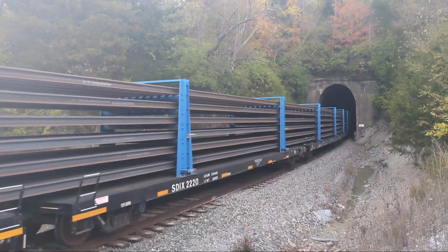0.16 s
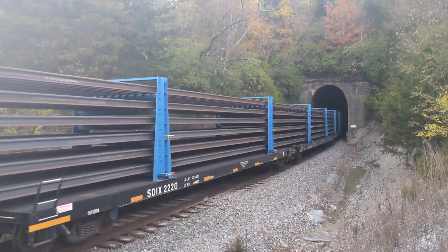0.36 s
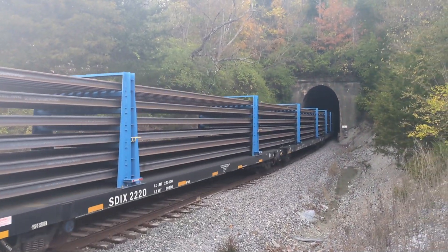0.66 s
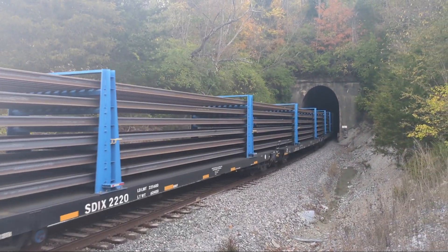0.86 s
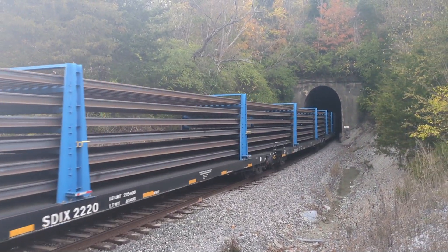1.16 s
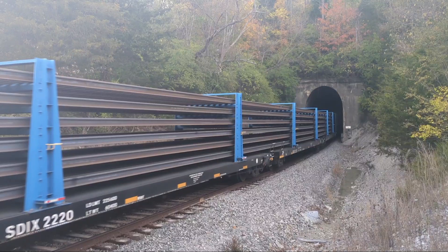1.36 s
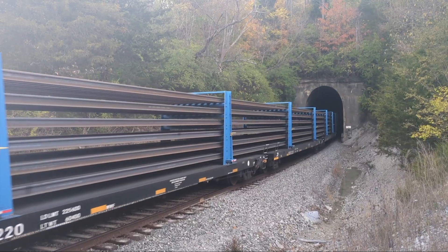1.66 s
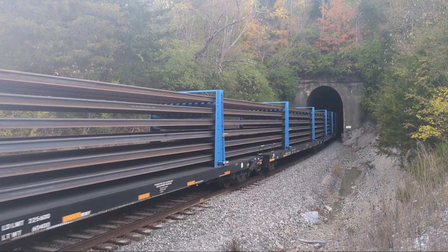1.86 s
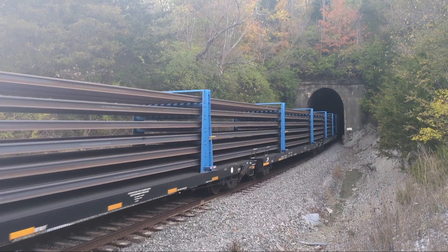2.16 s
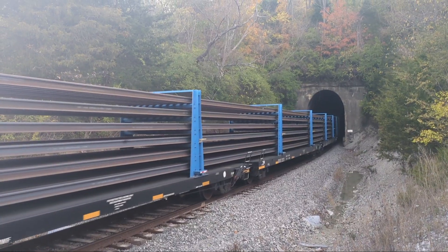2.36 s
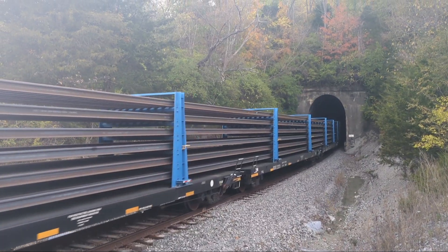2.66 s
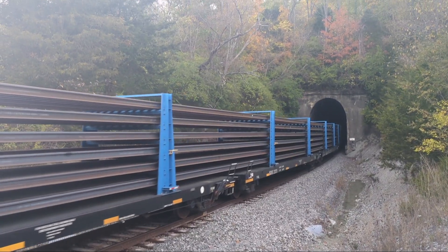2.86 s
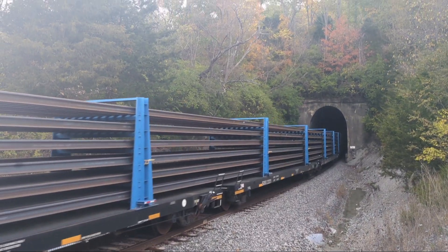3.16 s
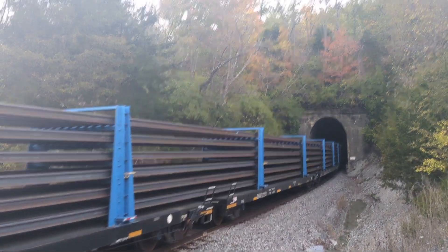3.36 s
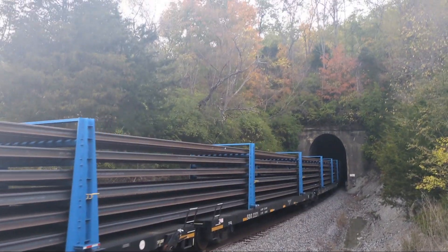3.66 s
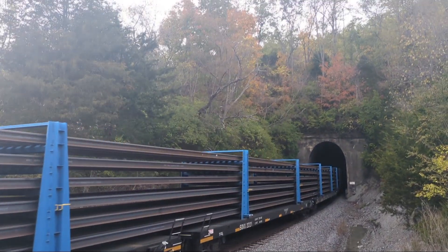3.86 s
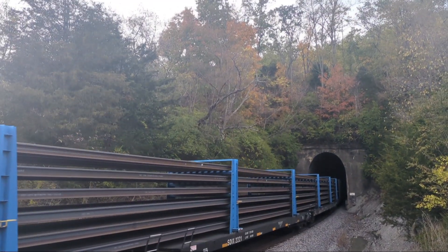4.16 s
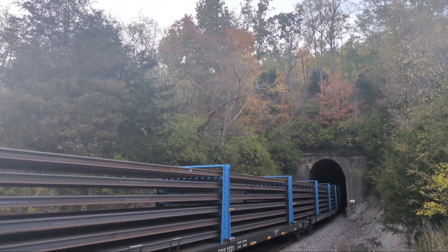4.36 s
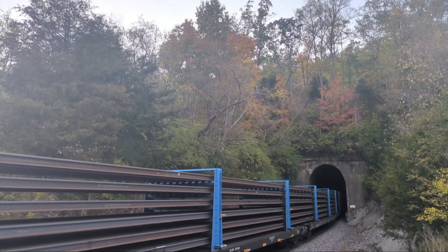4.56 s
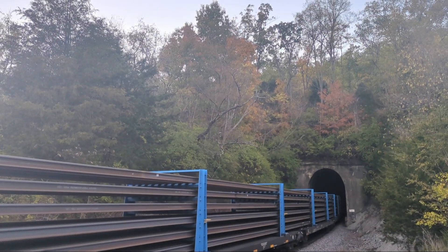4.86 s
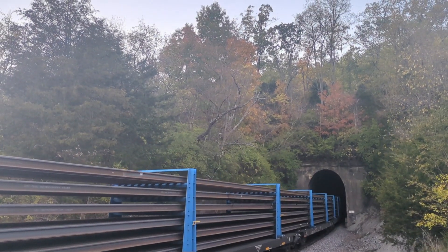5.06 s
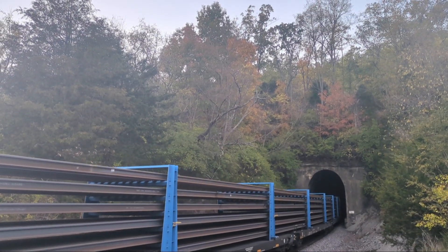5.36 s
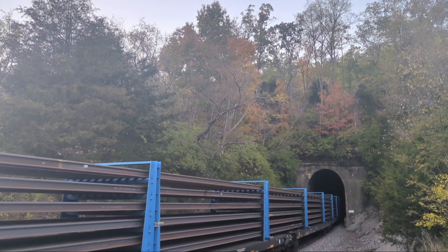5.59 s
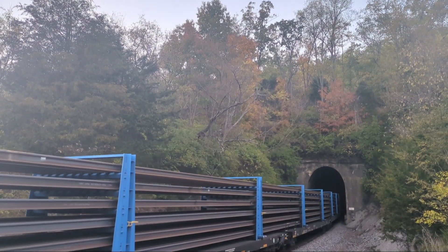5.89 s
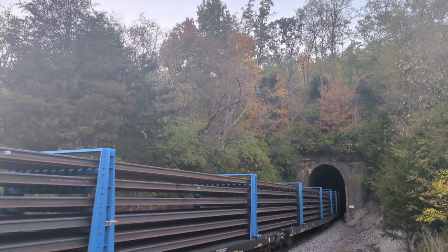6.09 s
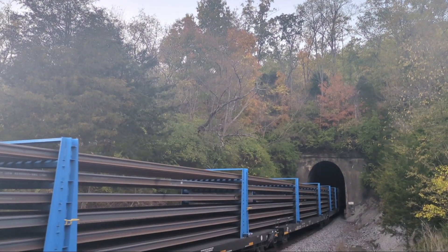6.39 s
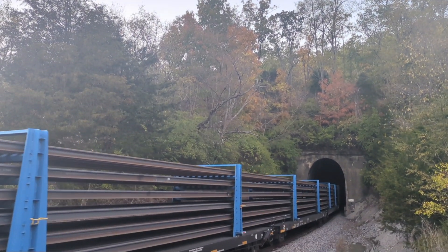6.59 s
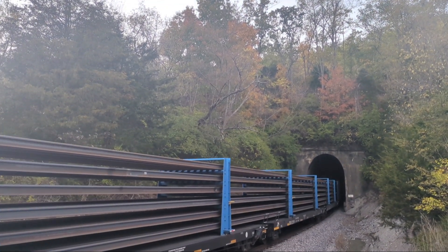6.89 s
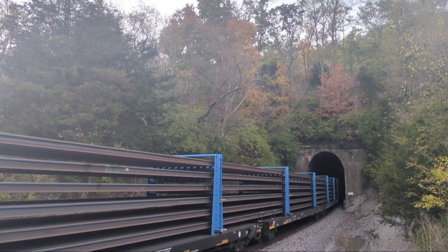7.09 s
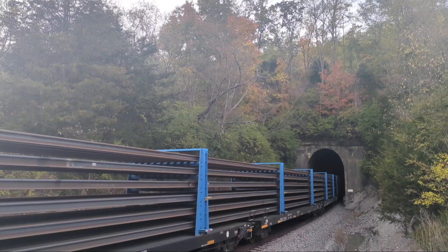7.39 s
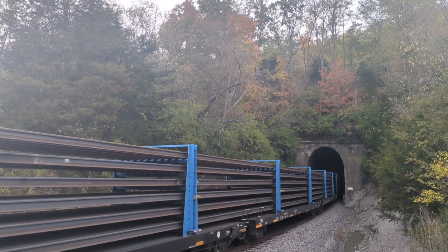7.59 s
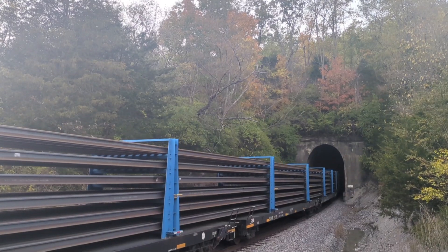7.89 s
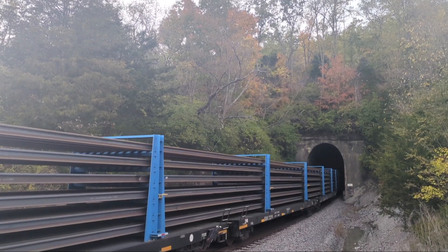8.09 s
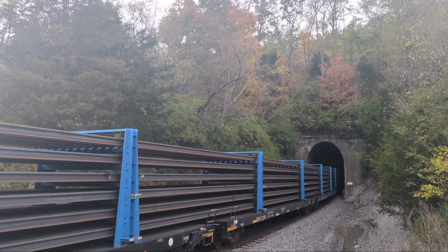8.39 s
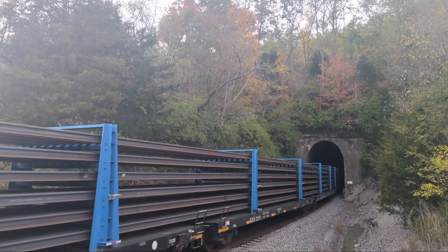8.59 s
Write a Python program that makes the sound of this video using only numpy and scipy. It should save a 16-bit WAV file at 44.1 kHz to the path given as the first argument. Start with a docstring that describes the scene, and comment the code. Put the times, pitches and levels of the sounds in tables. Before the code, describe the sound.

A long freight train crawls through a curve outdoors, its steel wheels squealing the whole time in high, overlapping tones with thinner whistles above. A low rumble and rolling roar run underneath. A coupling bangs and echoes about two seconds in, bright scrapes flare as the wheels grind on the rail, and a second bang comes near the end. The sound is wide, heard from close beside the track.

```python
"""Wheels squeal as a long freight train crawls through a curve at a tunnel mouth. Stick-slip sets them
singing on a mode near 4.9 kHz, with overtones, and whistling on other modes. Flanges grind on the rail;
now and then a coupling bangs and the cutting answers. Under it all lies the rumble of steel on rail.
Two spaced microphones hear the train from the left."""
import sys
import numpy as np
from scipy import signal
from scipy.fft import rfft, irfft, next_fast_len
from scipy.io import wavfile
from scipy.ndimage import uniform_filter1d, map_coordinates

SR = 44100
rng = np.random.default_rng(int(sys.argv[2]) if len(sys.argv) > 2 else 0)


def unload_audio(sound):
    """Save the sound as a 16-bit wav file, at the path given as the first command line argument."""
    columns = np.transpose(np.atleast_2d(sound))
    # keep every value between -1 and 1, then stretch to whole-number steps
    steps = np.round(np.clip(columns, -1, 1) * 32767)
    wavfile.write(sys.argv[1], SR, steps.astype(np.int16))


N = 385434
TIME = np.arange(N) / SR


def slipping_wheel(out, onset, length, first_hz, last_hz, partials_db, rough, blur_hz):
    """Adds one swelling, gliding tone, blurred by stick-slip and by echoes that differ per side."""
    start = int(np.clip((onset - .04) * SR, 0, N - 2))
    size = min(int((length + 0.0978) * SR), N - start)
    progress = np.arange(size) / size
    swell = np.clip(np.minimum(progress + (start == 0), 1 - progress) * (length + 0.22) / 0.16, 0, 1)
    phase = 2 * np.pi * np.cumsum(first_hz + (last_hz - first_hz) * progress) / SR
    for k, db in enumerate(partials_db, 1):
        rate = blur_hz * k * k
        flutter = lambda: wobble(rate, size, order=1) + 1j * wobble(rate, size, order=1)
        direct = (1 - rough) ** k * np.exp(2j * np.pi * rng.random()) + rough * flutter()
        sides = np.array([direct + .6 * flutter(), direct + .6 * flutter()])
        out[:, start:start + size] += amp(db) * swell * unit(np.real(sides * np.exp(1j * k * phase)))


# Cue list of close squeals and whistles: t/s, length/s, mid pitch/Hz, level/dB
SQUEAL_CUES = [(0.0, 0.62, 4850, -30), (0.0, 2.03, 4868, -29), (0.0, 1.58, 6831, -40),
               (0.14, 0.46, 4960, -30), (0.2, 0.7, 5086, -42), (0.65, 1.22, 4917, -30),
               (0.8, 0.44, 4838, -31), (1.2, 0.25, 6490, -46), (1.37, 0.77, 6895, -35),
               (1.5, 0.25, 6380, -48), (1.56, 0.23, 5000, -32), (1.92, 0.62, 4885, -31),
               (1.99, 1.0, 4952, -29), (2.43, 0.37, 7193, -43), (2.75, 0.52, 4865, -31),
               (2.83, 0.84, 4906, -30), (3.0, 0.75, 4945, -30), (2.55, 0.2, 2250, -54),
               (3.1, 0.4, 2400, -49), (3.15, 0.3, 1850, -52), (3.1, 0.94, 7128, -41),
               (3.19, 0.3, 6772, -35), (3.25, 0.35, 4725, -41), (3.3, 0.67, 6827, -43),
               (3.53, 0.36, 4866, -30), (3.45, 0.06, 2430, -50), (3.7, 0.2, 7830, -48),
               (3.7, 0.2, 8170, -47), (3.7, 0.45, 2180, -54), (3.8, 0.34, 4904, -31),
               (3.94, 0.62, 4963, -30), (3.94, 0.64, 6908, -45), (4.11, 0.27, 4787, -32),
               (4.28, 0.2, 1340, -48), (4.34, 0.6, 4843, -29), (4.5, 0.8, 5008, -33),
               (4.78, 0.1, 2580, -48), (4.9, 0.2, 1335, -43), (4.94, 0.6, 4841, -31),
               (5.27, 0.63, 7128, -37), (5.28, 0.52, 6859, -42), (5.33, 0.68, 4942, -32),
               (5.45, 0.15, 2190, -51), (5.6, 0.44, 4863, -31), (5.6, 0.7, 6400, -46),
               (5.8, 0.31, 6891, -36), (6.0, 0.3, 5010, -33), (6.14, 1.2, 4808, -27),
               (6.15, 0.3, 6665, -44), (6.19, 0.52, 4868, -31), (6.52, 0.52, 6891, -42),
               (6.71, 0.57, 4757, -31), (7.16, 0.45, 4942, -32), (7.3, 0.4, 5165, -37),
               (7.3, 0.2, 7377, -44), (7.35, 0.26, 6901, -38), (7.36, 0.28, 4827, -27),
               (7.38, 0.52, 5063, -37), (7.6, 0.3, 7031, -42), (7.65, 0.75, 4480, -48),
               (7.8, 0.48, 5122, -35), (7.88, 0.35, 6934, -38), (7.94, 0.4, 4818, -30),
               (8.01, 0.73, 5074, -33), (8.08, 0.2, 5095, -31), (8.4, 0.34, 4836, -28),
               (8.48, 0.26, 4622, -36), (8.6, 0.06, 3220, -48)]
MAIN_HZ, MAIN_RANGE_HZ, SAG_HZ_PER_S = 4900, (4550, 5250), 22  # the loud mode sags as a wheel rolls by
OCTAVE_DB, OCTAVE_DB_PER_HZ = -6, 0.0285  # at MAIN_HZ; higher wheels are richer
TWELFTH_DB = -23.5  # third partial, relative to the octave
FAINT_PER_S, FAINT_S, FAINT_DB = 6, 0.17, -46

def near_wheels():
    """Close wheels slip: rich squeals on the main mode, thin whistles on others, faint ones by chance."""
    out = np.zeros((2, N))
    when, which, detune, long, loud = rng.random((int(FAINT_PER_S * N / SR), 5)).T
    mode_hz, width_hz, mode_db = np.transpose(WHEEL_MODES)[:, (which * 5).astype(int)]
    faint_hz = mode_hz + width_hz * (2 * detune - 1)
    faint_db = FAINT_DB + .5 * mode_db + 6 * (loud - .5)
    faint_cues = zip(when * N / SR, FAINT_S * (.5 + long), faint_hz, faint_db)
    for onset, length, hz, db in [*SQUEAL_CUES, *faint_cues]:
        if MAIN_RANGE_HZ[0] < hz < MAIN_RANGE_HZ[1]:
            octave_db = db + OCTAVE_DB + OCTAVE_DB_PER_HZ * (hz - MAIN_HZ)
            partials_db = [db, octave_db, octave_db + TWELFTH_DB]
            sag_hz = SAG_HZ_PER_S * length / 2
            slipping_wheel(out, onset, length, hz + sag_hz, hz - sag_hz, partials_db, rough=.3, blur_hz=16)
        else:
            slipping_wheel(out, onset, length, hz, hz, [db, db - 26], rough=.4, blur_hz=22)
    return out


# Automation of the distant squeal chorus: t/s, level/dB, centre/Hz, spread/Hz (sets the tight-wide blend)
CHORUS_RIDE = [(0, -23.5, 4884, 89), (1.8, -25.5, 4903, 115), (2.6, -24.5, 4915, 91), (3.6, -27, 4900, 94),
               (5.4, -27.5, 4948, 121), (6.1, -24, 4920, 118), (6.6, -24, 4847, 85.5),
               (7.2, -25.5, 4850, 108), (7.9, -26, 4917, 139), (8.74, -22, 4927, 148)]
CHORUS_OCTAVE_DB = -7.5

def far_wheels():
    """Wheels all along the train squeal in turns around the main mode: a streaky band with overtones."""
    def crowd(k, width_hz):
        def shape(hz):
            offset = np.abs(hz / k - MAIN_HZ)
            return np.exp(-(offset / width_hz / 2) ** 2.4) + 0.08 / (1 + (offset / 300) ** 2) ** 2
        return noise(shape, patchy_db=4.5, bins=2, frames=14, fft=4096)

    db, centre_hz, spread_hz = automation(CHORUS_RIDE)
    glide = 2 * np.pi * np.cumsum(centre_hz - MAIN_HZ) / SR
    blend = np.clip((spread_hz - 70) / 90, 0, 1)
    out = 0
    for k, level_db in enumerate([db, db + CHORUS_OCTAVE_DB, db + CHORUS_OCTAVE_DB + TWELFTH_DB], 1):
        band = np.sqrt(1 - blend) * crowd(k, width_hz=59) + np.sqrt(blend) * crowd(k, width_hz=98)
        analytic = signal.hilbert(band, next_fast_len(N))[:, :N]
        out += amp(level_db) * np.real(analytic * np.exp(1j * k * glide))  # shift onto the moving centre
    return out


# Faders of the flange grind: t/s, hiss/dB, ring/dB
GRIND_RIDE = [(0.0, -55, -35), (0.5, -46, -38.5), (1.05, -53, -40.5), (1.92, -43, -35), (2.29, -44.5, -41),
              (2.92, -40, -39), (3.5, -50, -36), (4.04, -50, -38.5), (5.0, -43, -42.5), (5.6, -45.5, -35.5),
              (6.21, -39.5, -35.5), (7.06, -50, -42), (7.5, -41, -36.5), (8.74, -44.5, -40.5)]
# EQ of the friction hiss: f/Hz, level/dB
HISS_EQ = [(3000, -39), (4500, 8.5), (6000, 3.5), (9000, 6.5), (10500, -1), (12000, -6), (13000, -16),
           (15500, -17)]
# Accents where a flange bites harder: peak t/s, half length/s, treble boost/dB
SCRAPE_CUES = [(1.05, .08, 17), (2.85, 0.3, 24.5), (3.42, .07, 20), (3.62, .07, 21), (3.92, 0.072, 19),
               (5.0, .12, 9), (5.75, 0.19, 20), (6.25, 0.22, 26), (7.603, 0.11, 20)]
# High resonances of the wheels: f/Hz, width/Hz, level/dB
WHEEL_MODES = [(6400, 100, -8), (6834, 130, 2.5), (7160, 160, 0), (7510, 115, -2.5), (8510, 410, -12.5),
               (11700, 310, -14), (13800, 270, -15)]
TREBLE_DB = -66.5  # between scrapes

def flanges():
    """Flanges grind on the rail: a hiss, bright scrapes, and wheel modes that flare as thin streaks."""
    hiss_db, ring_db = automation(GRIND_RIDE)
    hiss = noise(lambda hz: amp(along(HISS_EQ, hz)), patchy_db=2.5, bins=8, frames=10)
    treble_eq = [(7000, -9), (11000, 4), (13000, -3), (15000, -16)]  # f/Hz, level/dB
    treble = noise(lambda hz: amp(along(treble_eq, hz)) * (hz > 5300), patchy_db=-1, bins=14, frames=3)
    bite_db = sum(db * np.exp(-((TIME - peak) / half) ** 2) for peak, half, db in SCRAPE_CUES)
    ring = noise(lambda hz: resonances(WHEEL_MODES, hz), patchy_db=4, bins=5, frames=12, fft=4096)
    return amp(hiss_db + 1.3 * wobble(11, N)) * hiss + amp(TREBLE_DB + bite_db) * treble + amp(ring_db) * ring


# Coupling hits, the loud ones with a rebound: t/s, level/dB, crash attack/s, low shelf/dB
BANG_CUES = [(1.09, -37.5, 0.014, 4), (1.805, -22, 0.01, -0.5), (1.925, -31.5, 0.0088, 5),
             (7.182, -21, 0.025, -0.5), (7.265, -34.5, 0.01, 0)]
# Resonances of the struck car frame: f/Hz, width/Hz, level/dB
FRAME_MODES = [(1396, 210, 1), (2000, 460, -0.5), (2260, 460, -13), (3060, 680, -12)]
# EQ of the echoing crash: f/Hz, level/dB
CRASH_EQ = [(150, -15), (300, -6), (840, -6.5), (1900, -8), (3000, -18), (4000, -20.5), (6000, -15.5),
            (11000, -19.5), (14500, -30)]
CLANG_T60_S, CRASH_T60_S, CRASH_DB = 0.25, 0.68, .5

def couplings():
    """A bang rings the frame briefly; a broad crash swells as it rolls back from tunnel and cutting."""
    out, t = np.zeros((2, N + SR)), np.arange(SR) / SR
    for onset, db, attack, thud_db in BANG_CUES:
        clang = noise(lambda hz: resonances(FRAME_MODES, hz), patchy_db=1.5, bins=2, frames=2, size=SR)
        crash = noise(lambda hz: amp(along(CRASH_EQ, hz) + thud_db * (hz < 900)),
                      patchy_db=-0.5, bins=10, frames=2, size=SR)
        blow = clang * amp(-60 * t / CLANG_T60_S) * (1 - np.exp(-t / 0.0033))
        echo = crash * amp(CRASH_DB - 60 * t / CRASH_T60_S) * (1 - np.exp(-t / attack)) ** 2
        start = round((onset - .003) * SR)
        out[:, start:start + SR] += amp(db) * (blow + echo)
    return out[:, :N]


# Fader of the tread roar: t/s, level/dB
ROAR_RIDE = [(0.0, -40), (1.78, -40.5), (1.97, -37.5), (2.3, -38.5), (3.14, -40.5), (3.5, -39),
             (4.18, -41.5), (4.6, -38), (6.16, -34.5), (6.76, -40.5), (7.47, -35.5), (8.23, -40),
             (8.74, -38.5)]
# EQ of the midrange roar: f/Hz, level/dB
ROAR_EQ = [(290, -10), (500, -4), (708, -7), (933, -3), (1280, -1.5), (1580, -4), (1870, -3.5), (2740, -11),
           (4200, -18.5), (5460, -27), (9240, -120)]
# EQ of the low rumble: f/Hz, level/dB
RUMBLE_EQ = [(26, -37), (45, -9.5), (64, 0.5), (81, 1), (114, -5.5), (167, -8), (205, -5.5), (317, -13),
             (700, -20.5), (910, -27.5), (1540, -120)]
RUMBLE_DB, RUMBLE_DB_PER_S = -31.5, 0.17

def rolling():
    """The bed: loaded cars rumble, slowly growing, and wheel treads roar on the rail."""
    roar_db, = automation(ROAR_RIDE)
    rumble = noise(lambda hz: amp(along(RUMBLE_EQ, hz)), patchy_db=1.5, bins=2, frames=6)
    roar = noise(lambda hz: amp(along(ROAR_EQ, hz)), patchy_db=2, bins=8, frames=5)
    rumble_db = RUMBLE_DB + RUMBLE_DB_PER_S * TIME + 0.35 * wobble(1.89, N)
    return amp(rumble_db) * rumble + amp(roar_db + 0.42 * wobble(7, N)) * roar


# Stereo image of the noise layers, narrow lows and wide highs: f/Hz, left-right correlation
STEREO_LIKENESS = [(60, 1), (150, 0.95), (300, 0.9), (600, 0.64), (1200, 0.48), (2200, 0.49), (4000, 0.13),
                   (4900, 0.32), (6000, 0.12), (15000, 0.13)]

def noise(gain, patchy_db, bins, frames, size=N, fft=1024):
    """Stereo noise of rms 1, shaped by gain(hz), with random level patches of bins by frames."""
    spectra = signal.stft(rng.standard_normal((2, size)), nperseg=fft)[2]
    patches = uniform_filter1d(uniform_filter1d(rng.standard_normal(spectra.shape[1:]), bins, 0), frames, 1)
    pair = signal.istft(spectra * amp(patchy_db * unit(patches)), nperseg=fft)[1][:, :size]
    angle = lambda hz: np.arccos(np.clip(along(STEREO_LIKENESS, hz), -1, 1)) / 2
    mid, side = filtered(pair, lambda hz: gain(hz) * [np.cos(angle(hz)), np.sin(angle(hz))])
    return unit(np.array([mid + side, mid - side]))


def amp(db):
    """dB to gain."""
    return 10 ** (np.asarray(db) / 20)


def unit(x):
    """x at rms 1."""
    return x / np.sqrt(np.mean(x ** 2) + 1e-20)


def along(points, hz):
    """Reads (f/Hz, value) points on a log frequency axis."""
    f, values = np.transpose(points)
    return np.interp(np.log(hz + 1), np.log(f + 1), values)


def automation(rows):
    """One scene-long curve for each column after the time."""
    t, *columns = np.transpose(rows)
    return [np.interp(TIME, t, column) for column in columns]


def wobble(rate, size, order=3):
    """A random curve, rate knots a second (400 at most); low orders leave corners."""
    knots = rng.standard_normal(int(size * 400 / SR) + 4)
    return map_coordinates(knots, [np.arange(size) * min(rate, 400) / SR], order=order)


def filtered(x, response):
    """x through a complex frequency response."""
    padded = next_fast_len(x.shape[-1] + 8192)
    return irfft(rfft(x, padded) * response(np.fft.rfftfreq(padded, 1 / SR)), padded)[..., :x.shape[-1]]


def resonances(modes, hz):
    """Summed gain of resonant peaks."""
    return sum(amp(db) / (1 + ((hz - centre) / width * 2) ** 2) for centre, width, db in modes)


def scene():
    """The stereo mix of the train."""
    return near_wheels() + far_wheels() + rolling() + flanges() + couplings()


# Balance between the microphones: f/Hz, left minus right/dB
BALANCE = [(60, 0), (200, 0.5), (700, 0), (1290, -4.5), (2600, 1), (4900, -1.5), (9800, 0.1), (15000, 1.5)]
# Head start of the left microphone: f/Hz, phase/rad
LEFT_LEAD = [(0, 0), (780, 1), (2240, 7.2), (15200, 57.9)]
LOW_CUT_HZ, TOP_HZ = 44, 15300

def record(dry):
    """Spaced microphones, the left hearing the train earlier; deep bass and extreme treble are cut."""
    def response(hz):
        side = np.array([[.5], [-.5]])
        balance = amp(side * along(BALANCE, hz))
        lead = np.exp(1j * side * np.interp(hz, *np.transpose(LEFT_LEAD)))
        return balance * lead * (hz < TOP_HZ) / (1 + (LOW_CUT_HZ / (hz + 1)) ** 6)
    return filtered(dry, response)


dry = scene()
out = record(dry)
unload_audio(out)
```